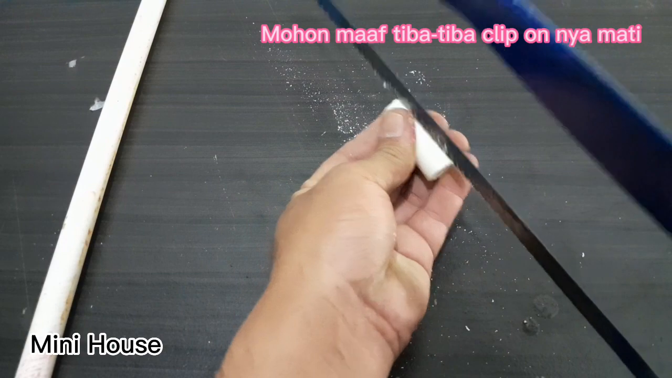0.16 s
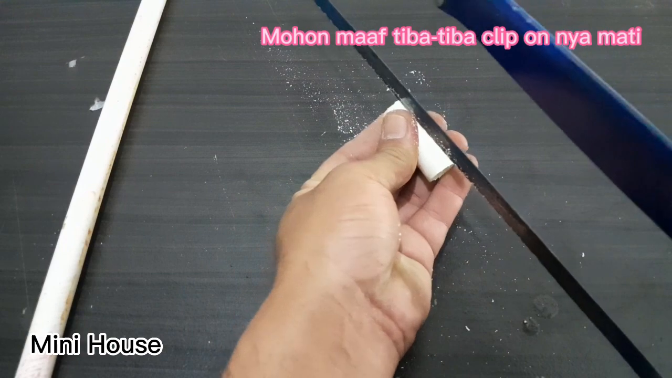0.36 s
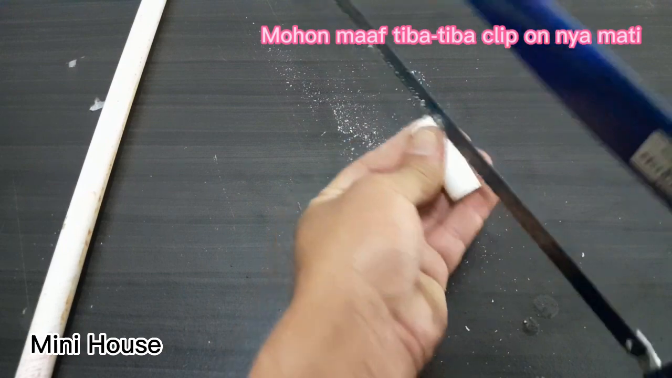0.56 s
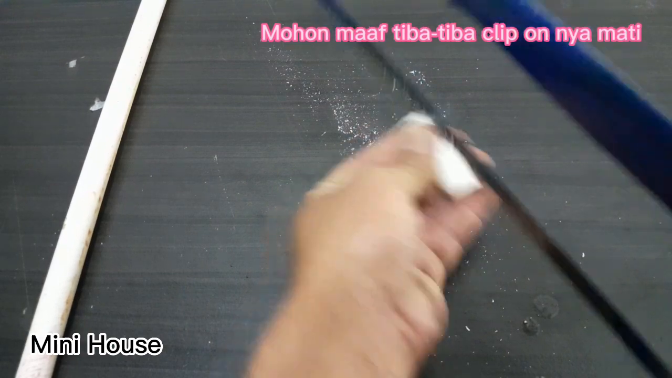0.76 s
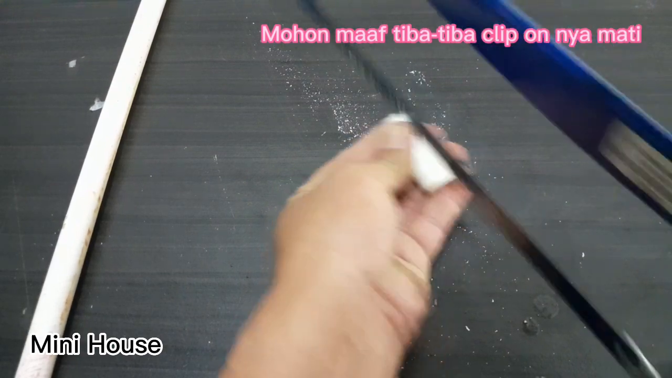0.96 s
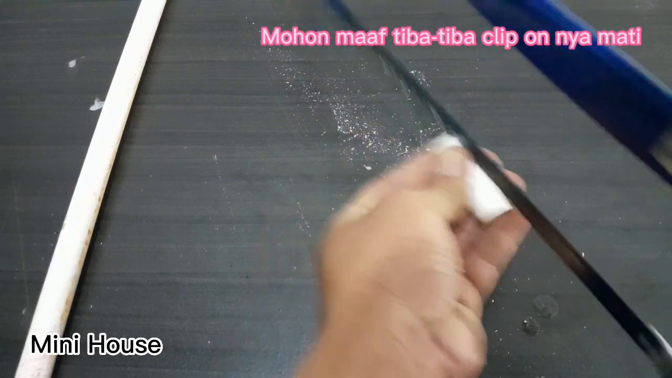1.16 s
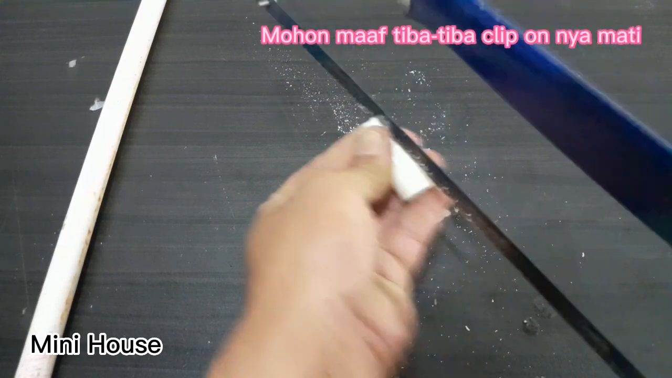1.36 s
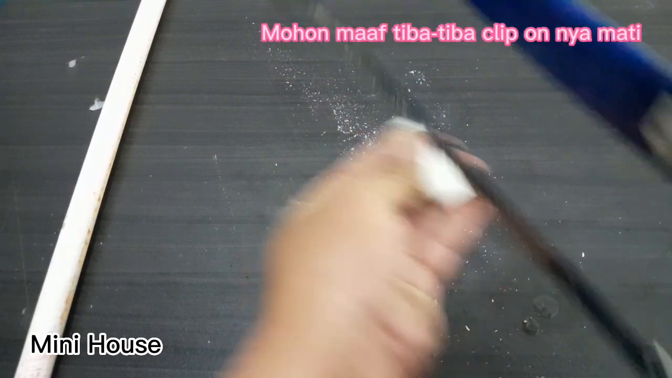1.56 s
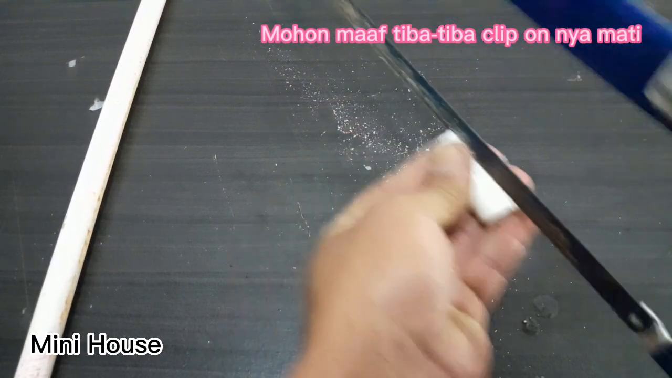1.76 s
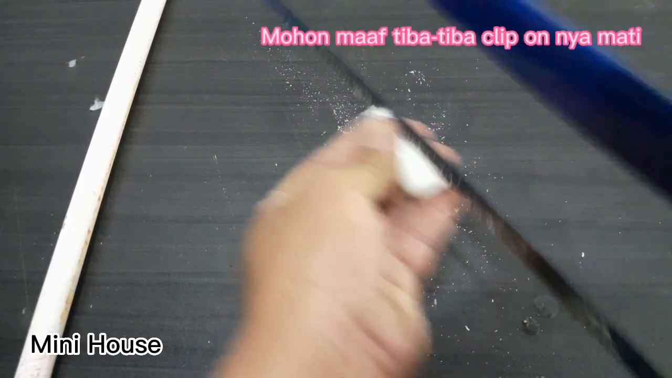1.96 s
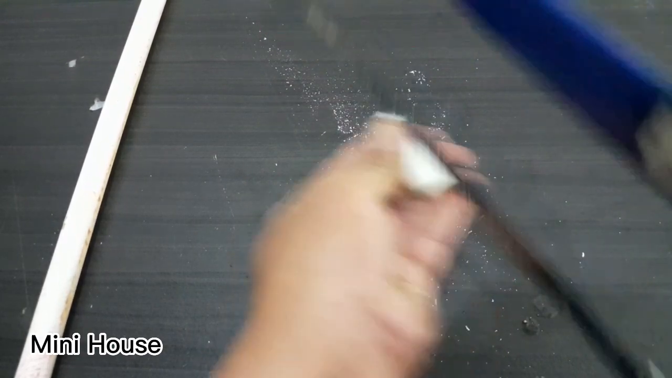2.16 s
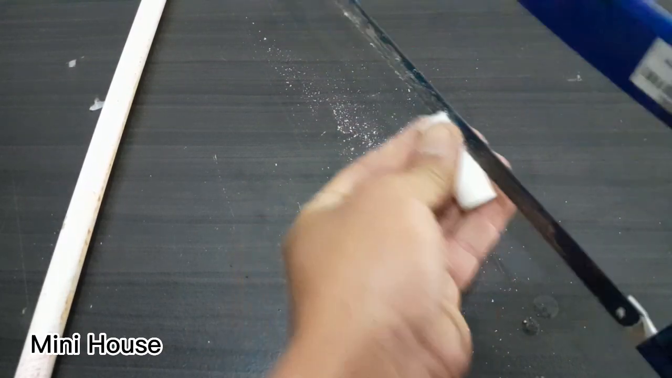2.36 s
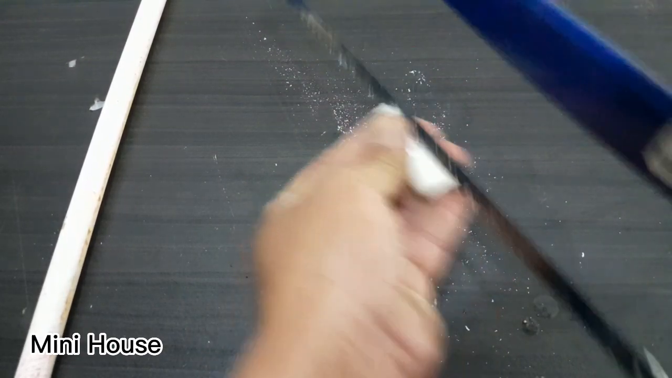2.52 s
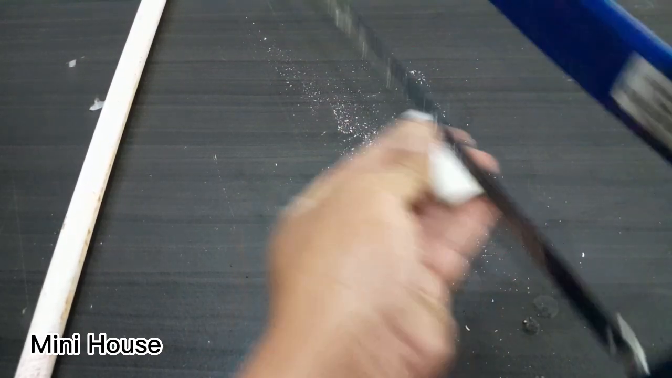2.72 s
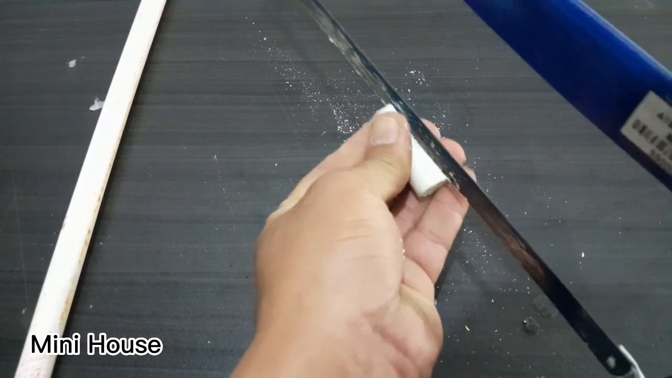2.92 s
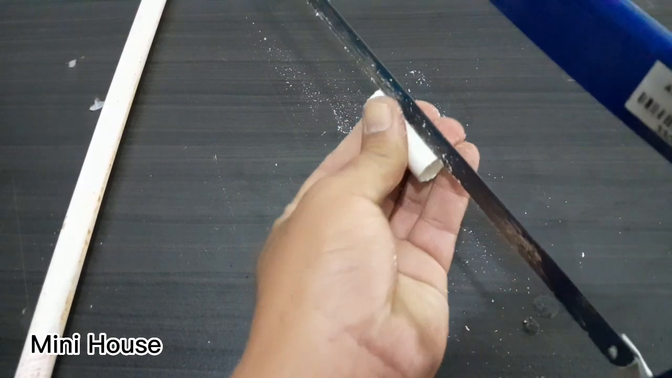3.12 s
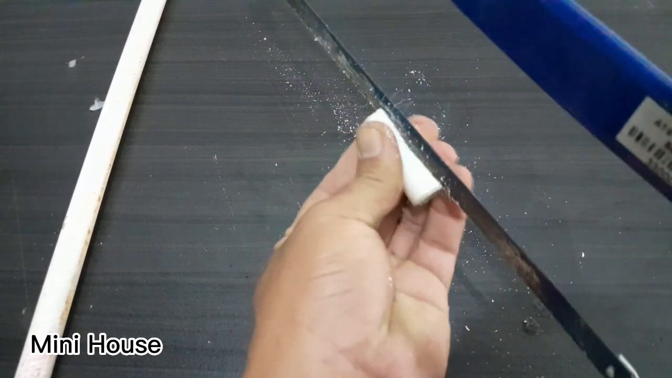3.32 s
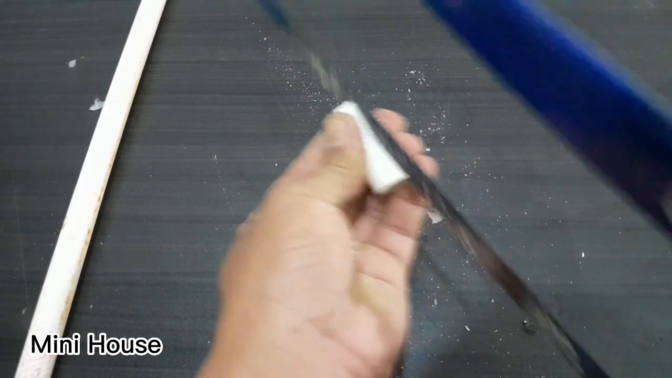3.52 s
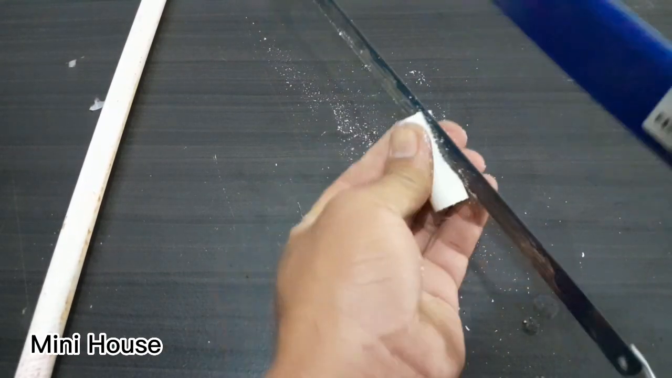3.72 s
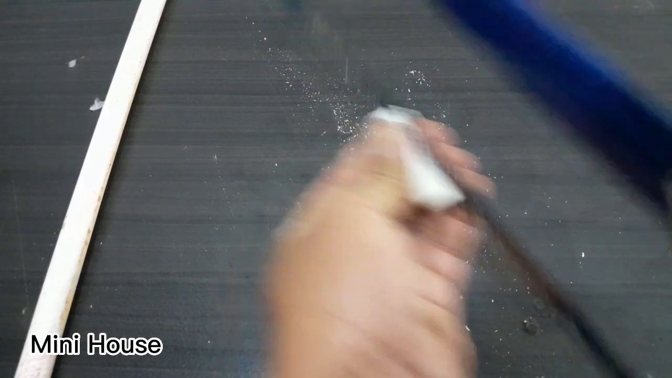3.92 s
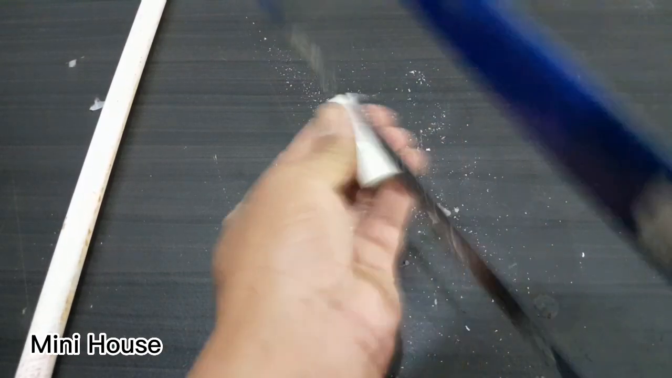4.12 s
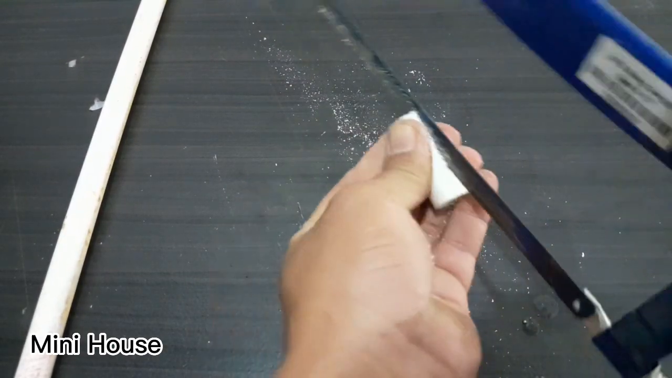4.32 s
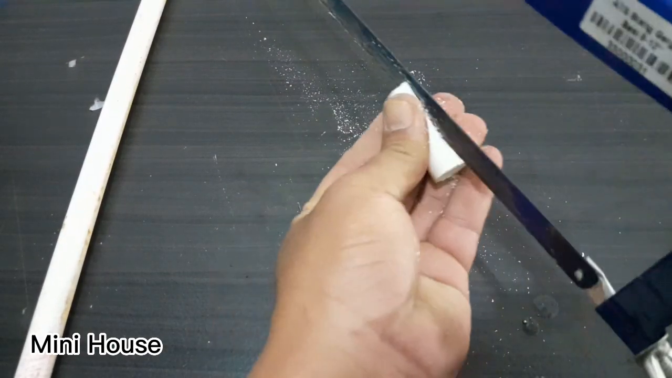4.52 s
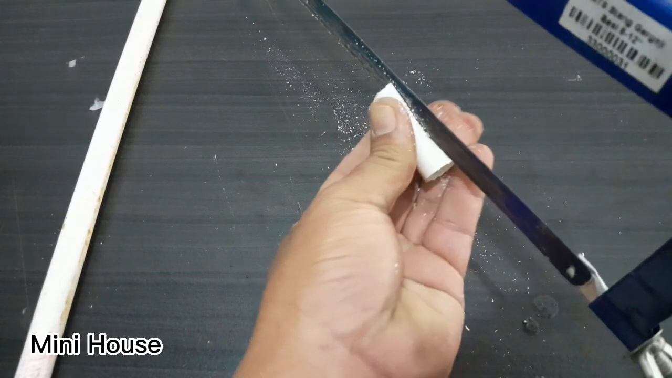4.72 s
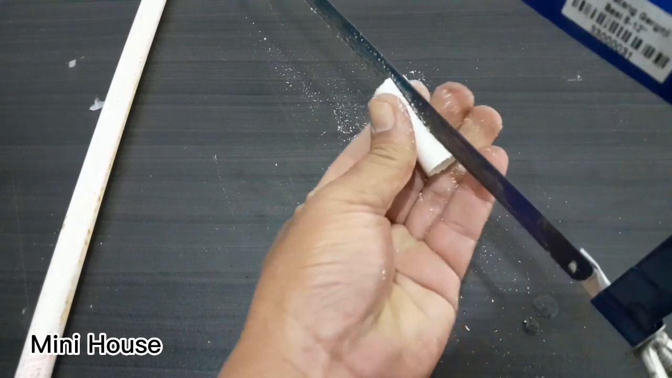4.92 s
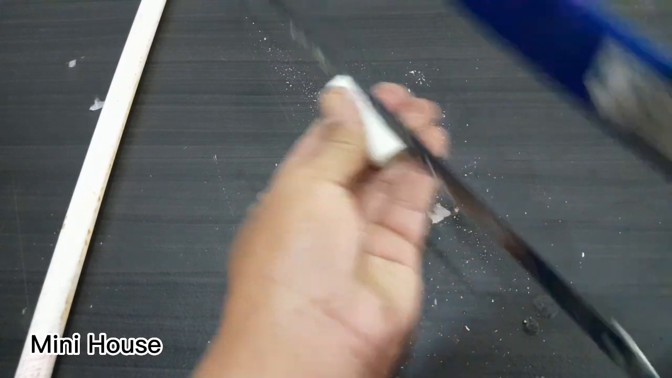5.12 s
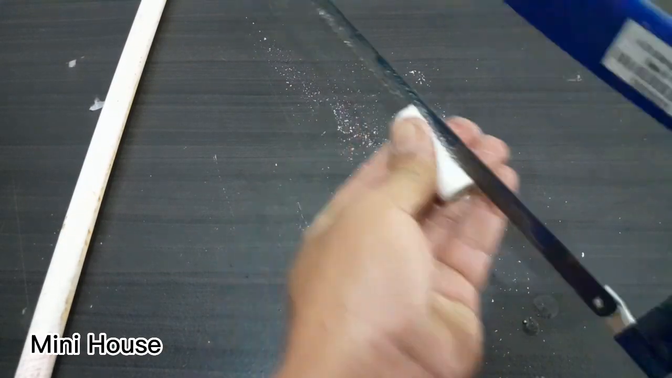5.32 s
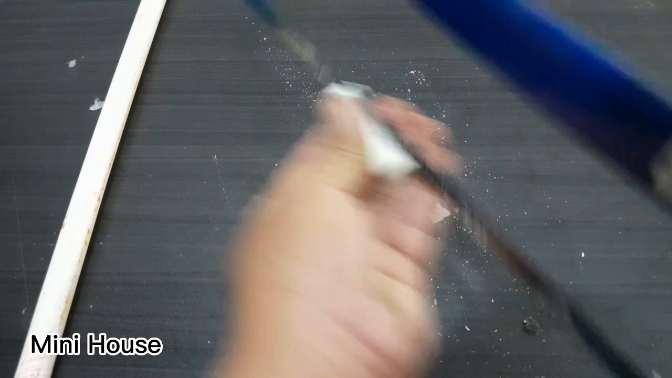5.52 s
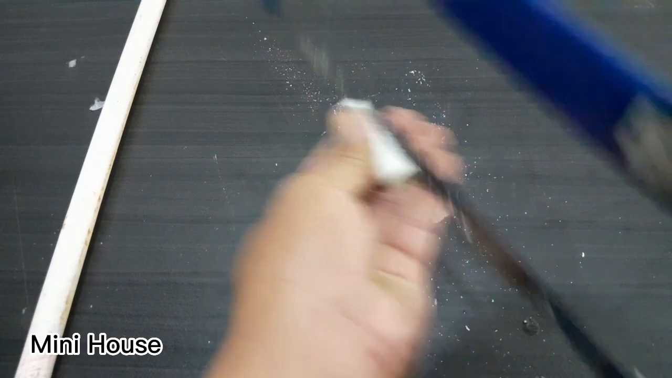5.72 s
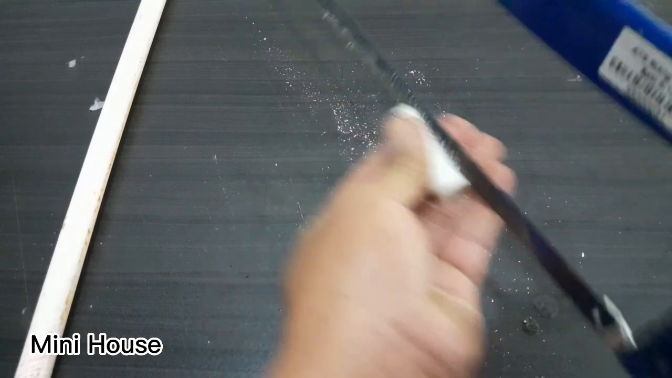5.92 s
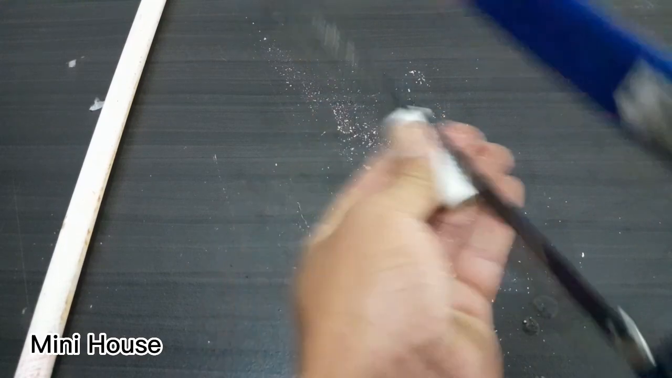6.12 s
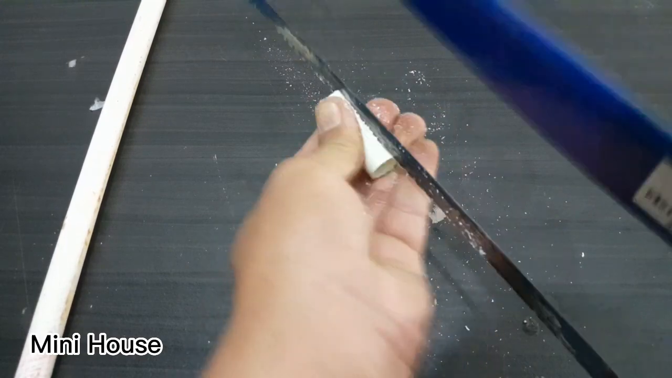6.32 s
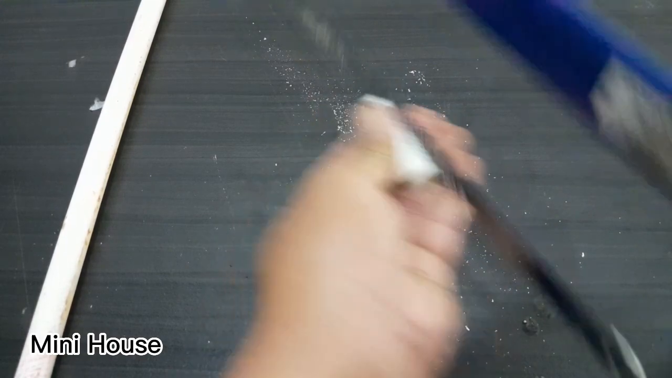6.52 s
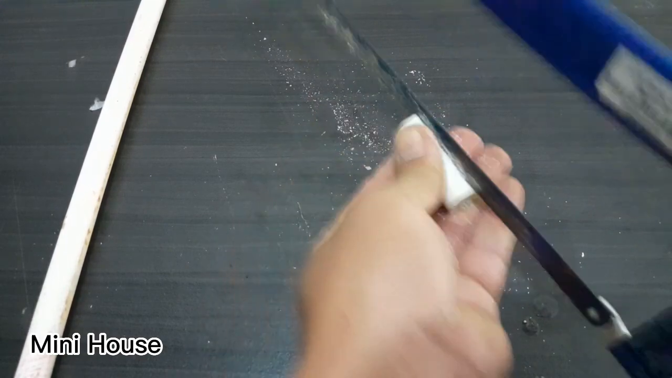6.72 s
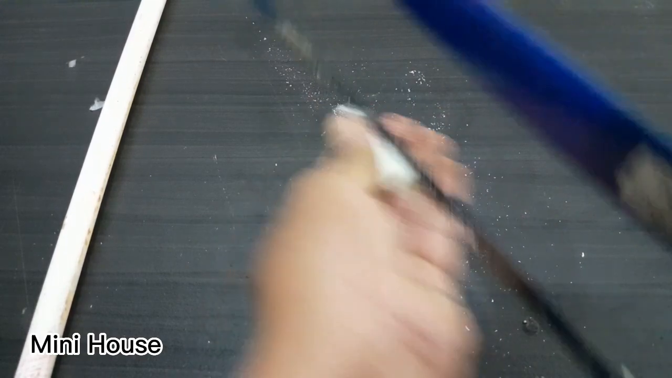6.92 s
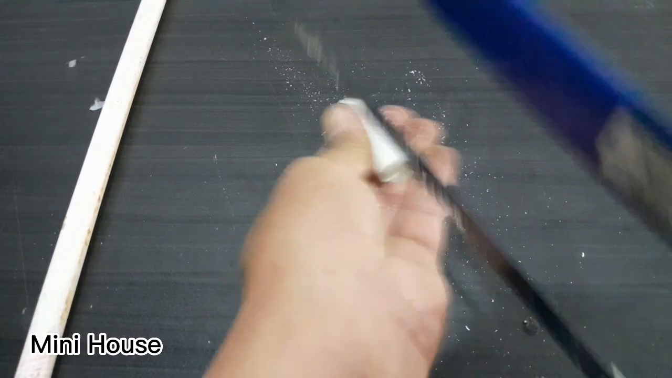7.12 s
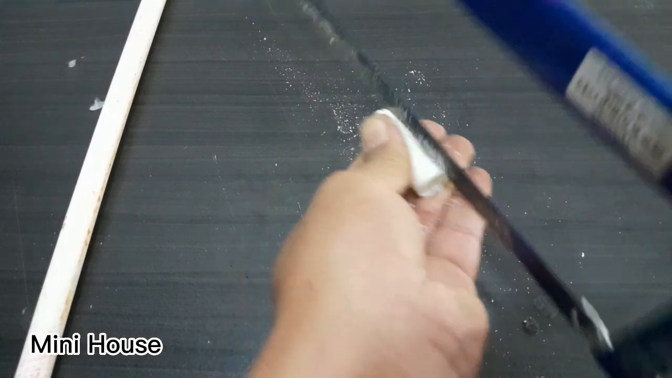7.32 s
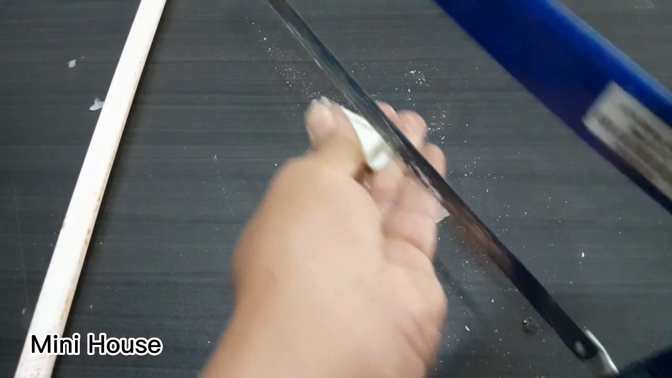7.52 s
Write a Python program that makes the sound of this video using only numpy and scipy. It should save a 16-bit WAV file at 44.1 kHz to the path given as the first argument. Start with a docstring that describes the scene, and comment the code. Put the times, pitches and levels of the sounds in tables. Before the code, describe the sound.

A hacksaw cuts a short plastic pipe close to the microphone in a quiet workshop with a slight echo and faint hiss. Three light rasping strokes begin at about 0.5 seconds, with soft bench thuds and low puffs of air on the microphone just before 1 second. From 1.2 to 2.9 seconds the saw runs quickly, about seven strokes a second, each a bright scrape with a hollow pipe note, a slight buzz and faint blade ringing. After a short pause, the blade catches with the loudest snap at 3.4 seconds. More strokes follow until a click at 4.4 seconds and another lull. From 5.1 seconds the sawing runs steadily again, hollower and more resonant, with small clicks around 6.5 seconds and a second sharp snap just after 7. The last stroke fades at about 7.5 seconds.

```python
"""Quick, rasping strokes of a hacksaw cut a short plastic pipe, close by in a quiet workshop.
Each stroke drags the teeth through the wall: chips tear off, the pipe sings a hollow note, the frame
buzzes higher as the blade moves faster, and the blade rings faintly. Now and then the blade catches
with a snap or the bench thuds. Moving air rumbles on a phone's two microphones over a faint hiss."""
import sys
import numpy as np
from scipy import signal
from scipy.fft import rfft, irfft, next_fast_len
from scipy.io import wavfile
from scipy.ndimage import uniform_filter1d, map_coordinates

SR = 44100
rng = np.random.default_rng(int(sys.argv[2]) if len(sys.argv) > 2 else 0)


def transcribe(u):
    """Save the signal u as a 16-bit wav file named by the first command-line argument.

    u: samples, shape (n,) or (channels, n), limited to [-1, 1]; the rate is SR.
    q: integer samples, one column per channel.
    """
    v = np.clip(np.atleast_2d(u).T, -1, 1)
    q = np.round(v * 32767).astype(np.int16)
    wavfile.write(sys.argv[1], SR, q)


N = 333837
T = np.arange(N) / SR

# saw strokes: (start [s], length [s], rasp level [dB], pipe boost [dB], top speed [teeth/s])
STROKES = [(0.47, 0.13, -46, -12.5, 567.5), (0.638, .13, -47, -25.5, 573.5),
           (0.803, .126, -42.5, -7.5, 682.9), (1.165, 0.1, -36.5, -9, 792),
           (1.324, .109, -39.5, -4.5, 809.3), (1.454, 0.1, -38, -2.5, 1020), (1.596, 0.1, -39, -3, 883),
           (1.714, 0.11, -38, 1.5, 908.4), (1.897, 0.11, -40, -0.5, 886), (2.026, 0.11, -36.5, 2, 898),
           (2.168, 0.11, -40, -4, 653), (2.318, 0.11, -38.5, 0.5, 777.3), (2.437, 0.12, -41, -4.5, 590),
           (2.58, 0.1, -38.5, 0, 779.4), (2.761, 0.099, -43.5, -20, 683), (3.518, .115, -46, -1.5, 582),
           (3.659, 0.1, -37.5, -2.5, 656), (3.819, 0.12, -38, -6, 680.5), (3.956, .11, -32.5, -4.5, 899),
           (4.103, .12, -36.5, -2.5, 654), (4.237, 0.12, -36.5, 7, 874), (5.102, 0.16, -46.5, 1.9, 625),
           (5.281, 0.1, -40, 3, 764.5), (5.437, 0.13, -39, 2, 877.3), (5.574, 0.11, -35.5, 6, 951),
           (5.717, .126, -39, 0, 716.6), (5.864, 0.097, -38.5, 5, 896.6), (5.983, 0.12, -41.5, 4, 650.5),
           (6.132, .095, -39, 5.5, 792), (6.272, 0.12, -38.5, 0.8, 596.7), (6.415, 0.11, -40.5, 2.5, 896),
           (6.531, 0.14, -43.5, 3.5, 650), (6.683, 0.12, -39.5, 3, 779.6), (6.846, 0.11, -39, 1.5, 685.5),
           (6.973, 0.12, -38, 6, 929), (7.089, 0.15, -42.5, 3, 647), (7.247, 0.1, -41, 0.5, 636.6),
           (7.38, 0.14, -48, -0.5, 625)]
# moments when the blade catches: (time [s], level [dB], pipe boost [dB])
SNAPS = [(0.2254, -55, -27), (0.466, -51, -15), (1.0087, -40, -9), (1.3294, -48, -8), (1.719, -45, 1),
         (1.7595, -34.5, 0), (2.0459, -59, 9), (2.4595, -37, -14), (2.7681, -50, -1), (3.0937, -55.5, 0),
         (3.3725, -16, -26), (3.836, -44, -3), (3.959, -46, -3), (4.4072, -34.5, -1.5), (4.4762, -53, 2),
         (5.4467, -40.5, -1.5), (5.5889, -42, 6), (5.8664, -39, 2.5), (6.1306, -42, -1.5),
         (6.1602, -45, -2), (6.422, -33.5, 1.3), (6.4584, -38, 1.2), (6.4702, -31.5, 1.5),
         (6.6955, -29, 4.5), (6.8538, -45, 5.5), (7.0606, -22.5, -28), (7.2499, -44, -4)]
# tones of the pipe with a deep cut: (pitch [Hz], width [Hz], level [dB])
DEEP_CUT_TONES = [(2750, 167, 0.5), (2905, 58, -6), (3210, 273, 11), (3474, 440, 6), (4140, 525, 1)]
# tone colour of the shaking bench: (frequency [Hz], level [dB])
BENCH_COLOUR = [(40, -32), (80, -0.5), (160, 1.5), (250, -7), (460, -12), (700, -19), (1200, -80)]


def amp(db):
    """Turn decibels into a gain; amp(-60 * t / fade) falls by 60 dB in the fade time."""
    return 10 ** (np.asarray(db) / 20)


def unit(x):
    """Scale x to an average (rms) strength of 1."""
    return x / np.sqrt(np.mean(x ** 2) + 1e-20)


def along(points, hz):
    """Read a (frequency, value) table between its rows, on a pitch-like scale."""
    f, v = np.transpose(points)
    return np.interp(np.log(hz + 1), np.log(f + 1), v)


def curve(rows, column=1):
    """Join the rows of a time table into one value per sample."""
    rows = np.asarray(rows)
    return np.interp(T, rows[:, 0], rows[:, column])


def wobble(rate):
    """Glide smoothly through `rate` random values a second."""
    return map_coordinates(rng.standard_normal(int(N * rate / SR) + 4), [T * rate])


def filtered(x, response):
    """Scale and delay each frequency of x as response(hz) says."""
    size = next_fast_len(N + SR // 4)
    return irfft(rfft(x, size) * response(np.fft.rfftfreq(size, 1 / SR)), size)[..., :N]


def coloured(x, colour):
    """Shape x with a (frequency, level) table."""
    return filtered(x, lambda hz: amp(along(colour, hz)))


def resonances(tones):
    """A filter that rings at the given tones and keeps white noise equally strong."""
    def response(f):
        total = sum((-1) ** k * amp(db) * 1j * f * width / (hz * hz - f * f + 1j * f * width)
                    for k, (hz, width, db) in enumerate(tones))
        return total / np.sqrt(np.mean(np.abs(total) ** 2))
    return response


def microphones(pair, left_lead_s):
    """Spread two unrelated versions of a sound over both microphones; the left hears it first."""
    likeness = [(300, 0.1), (1500, 0.23), (3200, 1), (4500, 0.43), (6500, 0.64), (9000, 0.07),
                (15000, 0.068)]  # how alike both sides sound: (frequency [Hz], likeness [0-1])
    balance = [(400, 15.5), (700, -11.5), (1300, -0.5), (2400, 2.5), (4400, -0.5), (8000, 1), (15000, 1)]  # which side is louder: (frequency [Hz], left over right [dB])
    angle = lambda hz: np.arccos(np.clip(along(likeness, hz), -1, 1)) / 2
    mid, side = filtered(pair, lambda hz: np.array([np.cos(angle(hz)), np.sin(angle(hz))]))
    sign = np.array([[1], [-1]])
    lead = lambda hz: np.exp(1j * np.pi * hz * left_lead_s * sign)
    return filtered(mid + sign * side, lambda hz: amp(sign * along(balance, hz) / 2) * lead(hz))


def outdoor_hiss():
    """A faint, wavering hiss from outside, different on each side."""
    colour = [(90, -15), (170, 2.5), (400, -9), (1250, -23.5), (1800, -19), (2300, -5.5), (2900, -12.5),
              (3700, -11), (4400, -2.5), (5300, -1.5), (6000, -10), (7300, 0), (8200, -13), (9200, -22.5),
              (15600, -19)]  # far-off hiss: (frequency [Hz], level [dB])
    noise = coloured(rng.standard_normal((2, N)), colour)
    return amp(-65 + 1.5 * wobble(4.62)) * unit(noise)


def air_rumble():
    """Air stirred by the arm buffets each microphone on its own, the right one far more."""
    draught = [(0.0, -80), (0.21, -64.5), (0.59, -62.5), (1.1, -57), (2.04, -64.5), (2.7, -60.5),
               (2.99, -73), (3.6, -69), (4.3, -60.5), (4.45, -74), (4.81, -75), (5.21, -66), (5.63, -60),
               (6.98, -66), (7.57, -70)]  # steady flow of air: (time [s], level [dB])
    puffs = [(0.69, 0.036, -53), (0.827, 0.032, -32.5), (0.912, 0.026, -33), (1.155, 0.13, -45.5),
             (1.93, 0.019, -50), (2.2, 0.027, -58), (2.78, .03, -58), (3.7, 0.049, -56), (3.78, 0.1, -53.5),
             (4.3, 0.073, -57), (5.6, 0.094, -58), (7.02, 0.039, -60), (7.3, 0.051, -55)]  # single gusts: (start [s], hold [s], level [dB])
    colour = [(15, -48), (25, -38), (48, 2.5), (88, 5), (140, -9.5), (240, -20.5), (400, -34), (800, -104)]  # air on a microphone: (frequency [Hz], level [dB])
    rise_db_per_s, fall_db_per_s = 1800, 700
    puff_db = [db - rise_db_per_s * (start - T).clip(0) - fall_db_per_s * (T - start - hold).clip(0)
               for start, hold, db in puffs]
    right_db = np.max([curve(draught), *puff_db], axis=0) + 5
    left_db = np.minimum(right_db - 6.5, -58)
    flutter = amp(2.7 * np.array([wobble(15), wobble(14)]))
    return amp([left_db, right_db]) * unit(coloured(flutter * rng.standard_normal((2, N)), colour))


def blade_moves():
    """List strokes, then slides, as (start, fastest moment, end, rasp level, pipe boost, top speed)."""
    # the blade jerks free and slides to rest: (start [s], length [s], rasp level [dB], pipe boost [dB])
    slides = [(0.221, 0.087, -66, -23), (1.002, 0.12, -41.5, -19), (3.044, .06, -70.5, 9.5),
              (3.304, .07, -61, -13), (3.372, .17, -50, -15), (4.474, .037, -57, 8.5),
              (4.904, .035, -72, 9), (4.97, 0.035, -77, 12)]
    slide_teeth_per_s = 401.4
    moves = []
    for start, length, db, pipe_db, top_speed in STROKES:
        speed_up_share = .58 + .3 * (length - .115) + .007 * pipe_db
        moves.append((start, start + speed_up_share * length, start + length, db, pipe_db, top_speed))
    for start, length, db, pipe_db in slides:
        moves.append((start, start + .06 * length, start + length, db, pipe_db, slide_teeth_per_s))
    return moves


def arm():
    """The arm's speed sets the gains of rasp, pipe and buzz, and the teeth passing per second."""
    # the frame's buzz swells and dips from one group of strokes to the next: (time [s], level [dB])
    buzz_trim = [(0.5, -6.5), (1.9, -12), (2.65, -7), (2.8, -20.5), (4.3, -9.5), (5.2, -15.5), (5.7, -8.5),
                 (6.3, -16.5), (6.95, -16.5), (7.5, -8.5)]
    buzz_db_per_octave = 6.5
    rasp, pipe, buzz, rate = np.zeros((4, N))
    for start, fastest, end, db, pipe_db, top_speed in blade_moves():
        near = slice(max(round((fastest - .3) * SR), 0), round((fastest + .3) * SR))
        edges = lambda stretch: fastest + stretch * (np.array([start, fastest, end]) - fastest)
        arc = lambda stretch: np.sin(np.pi * np.interp(T[near], edges(stretch), [0, .5, 1])).clip(0)
        speed = arc(1)
        contact = speed + amp(-17) * arc(1.89)  # the blade still creeps while the arm turns round
        rasp[near] += amp(db) * contact
        pipe[near] += amp(db + pipe_db) * contact ** 2  # the wall rings most at full pressure
        buzz[near] += amp(db + buzz_db_per_octave * np.log2(top_speed / 800)) * speed
        rate[near] = np.maximum(rate[near], top_speed * speed ** .42)
    return rasp, pipe, buzz * amp(curve(buzz_trim)), np.maximum(rate, 350)


def teeth(rate, jitter, scatter_db):
    """One click for each tooth that passes the wall, unevenly spaced and sized."""
    at = np.flatnonzero(np.diff(np.floor(np.cumsum(rate) / SR)))
    shift, size = rng.standard_normal((N, 2))[at].T
    at = np.clip(at + shift * (jitter * SR / rate)[at], 0, N - 1).astype(int)
    return np.bincount(at, amp(scatter_db * size), N)


def chips(bursts, rub, flicker_db):
    """Noise of tearing plastic: a burst for each tooth on top of steady rubbing."""
    return unit((bursts + rub) * amp(flicker_db * wobble(70)) * rng.standard_normal((2, N)))


def pipe_note(gain, bursts, beat, depth):
    """Chips and teeth ring the hollow pipe, whose note changes as the cut deepens."""
    shallow_tones = [(2564, 230, -1.5), (2810, 297, 3), (3434, 196, 1.5)]  # pipe with a shallow cut: (pitch [Hz], width [Hz], level [dB])
    drive = gain * (chips(bursts, rub=0.51, flicker_db=2.5) + 0.2 * unit(beat))
    shallow = filtered(drive * np.sqrt(1 - depth), resonances(shallow_tones))
    return shallow + filtered(drive * np.sqrt(depth), resonances(DEEP_CUT_TONES))


def chip_rasp(gain, bursts):
    """Tearing chips make a bright rasp whose colour shifts as blade and grip change place."""
    colour = [(180, -36), (400, -17.5), (900, -12), (1300, -8), (2200, -3.5), (3000, -3), (3600, -0.5),
              (4600, -1.5), (6500, 0.5), (8300, 1), (9200, -9.5), (12000, -4.5), (14600, -6), (15700, -13)]  # teeth scraping plastic: (frequency [Hz], level [dB])
    steel_tones = [(2600, 490, 6), (5100, 430, 1), (6520, 550, -2.5), (7700, 260, -19), (7980, 160, -1)]  # muffled blade tones: (pitch [Hz], width [Hz], level [dB])
    steel = lambda hz: 1 + amp(-17) * np.abs(resonances(steel_tones)(hz))
    scrape = gain * chips(bursts, rub=6.1, flicker_db=0.53)
    scrape = filtered(scrape, lambda hz: amp(along(colour, hz) - 1) * steel(hz))
    bands = signal.stft(scrape, nperseg=256)[2]
    patches = uniform_filter1d(rng.standard_normal(bands.shape[1:]), size=4, axis=0)  # blur in pitch
    patches = uniform_filter1d(patches, size=14, axis=1)  # and in time
    return signal.istft(bands * amp(3.5 * unit(patches)), nperseg=256)[1][:, :N]


def frame_buzz(gain, beat):
    """The beat of the teeth buzzes through the saw frame, louder on the left."""
    frame_tones = [(629, 76, 6.5), (890, 400, -2.5), (1856, 74, 5.5)]  # saw frame: (pitch [Hz], width [Hz], level [dB])
    broad_tones = [(780, 500, 0), (1900, 700, -8)]  # same columns
    buzz = filtered(beat, lambda hz: resonances(frame_tones)(hz) * resonances(broad_tones)(hz))
    return amp(-4) * gain * unit(buzz) * [[1], [.7]]


def sawing():
    """Each tooth tears a short burst of chips; pipe, frame and bench answer."""
    cut_depth = [(0, 0), (1.6, 0.15), (2.1, .45), (2.9, 0.5), (3.4, 0.96), (7.6, 1)]  # progress of the cut: (time [s], shallow to deep [0-1])
    depth = np.clip(curve(cut_depth), 0, 1)
    rasp_gain, pipe_gain, buzz_gain, rate = arm()
    bites = teeth(rate, jitter=.25, scatter_db=1.5)
    bursts = signal.fftconvolve(bites, amp(-60 * T[:400] / 0.0044))[:N]
    bursts /= uniform_filter1d(bursts, size=1300) + 0.00088  # even out, so the arm sets the loudness
    beat = teeth(rate, jitter=.075 + .12 * (1 - depth), scatter_db=4)  # steadier in a deep cut
    cut = pipe_note(pipe_gain, bursts, beat, depth) + chip_rasp(rasp_gain, bursts)
    cut += frame_buzz(buzz_gain, beat)
    bench_shake = amp(-23) * rasp_gain * unit(coloured(rng.standard_normal(N), BENCH_COLOUR))
    return microphones(cut, left_lead_s=36e-6) + bench_shake


def blade_snaps():
    """The blade catches, then slips in a brief burst that also knocks the pipe."""
    snap_tones = [(1100, 610, -18.5), (1800, 550, -10), (2360, 250, -5.5), (3320, 220, 1.5),
                  (4530, 750, -1.5), (5720, 720, 2), (6790, 400, 3), (8240, 600, -7.5), (12300, 2000, -20),
                  (15150, 1100, -23)]  # blade held in the cut: (pitch [Hz], width [Hz], level [dB])
    blade, pipe = np.zeros((2, 2, N + SR))
    t = T[:SR // 10]
    fade = amp(-60 * t / 0.015) + 0.077 * amp(-60 * t / 0.06)  # sharp crack, faint tail
    fade *= 1 - np.exp(-t / 0.000075)
    knock = np.outer([1, .3], np.hanning(20) * np.sin(2 * np.pi * 2900 * t[:20]))
    for start, db, pipe_db in SNAPS:
        at = round(start * SR)
        blade[:, at:at + len(t)] += amp(db) * fade * rng.standard_normal((2, len(t)))
        pipe[:, at:at + 20] += amp(db + pipe_db + 8.5) * knock
    cracks = filtered(blade[:, :N], resonances(snap_tones))
    knocks = filtered(pipe[:, :N], resonances(DEEP_CUT_TONES))
    return microphones(cracks + knocks, left_lead_s=43e-6)


def blade_ring():
    """Snaps and the fastest moment of each stroke kick two blade tones that swell and die away."""
    # tones the pipe hardly muffles: (pitch [Hz], fade time [s], left over right [dB])
    tones = [(1545, .95, 9), (1835, .33, 3)]
    # how freely the blade rings: (time [s], lower tone [dB], upper tone [dB])
    freedom = [(0.55, -26, -22), (1.05, -26, -8), (1.25, -23.5, -13), (2.25, -20.5, -20), (2.65, -36, -25),
               (3.4, -16.5, -7), (3.8, -29.5, -21.5), (4.3, -19, -22), (5.15, -24, -29), (5.4, -19.5, -21),
               (6.35, -20, -27.5), (6.6, -47, -42), (7.05, -20, -16.5), (7.5, -17, -12)]
    strokes = [(fastest, db) for _, fastest, _, db, *_ in blade_moves()[:len(STROKES)]]
    when, kick_db = np.transpose(strokes + [(start, db - 31) for start, db, _ in SNAPS])
    at = (when * SR).astype(int)
    ring = 0
    for column, (hz, fade_s, left_db) in enumerate(tones, 1):
        kicks = np.full(N, -200.)
        kicks[at] = kick_db + curve(freedom, column)[at] + 60 * when / fade_s
        level = amp(np.maximum.accumulate(kicks) - 60 * T / fade_s)  # the loudest fading kick wins
        level = uniform_filter1d(np.pad(level, (300, 0))[:N], size=1100)  # soften each start
        phase = 2 * np.pi * hz * T + 0.8 * wobble(7.4)  # fresh bites push the phase about
        tone = np.sin(phase + [[0], [1.3]]) * amp([[0], [-left_db]])
        ring += level * amp(5 + 2.5 * wobble(14)) * tone
    return ring


def bench_thuds():
    """Soft bumps ring the bench, a little differently each time, and leave a short rattle."""
    bumps = [(0.474, -63), (0.541, -45.5), (0.675, -38), (0.868, -40.5), (0.948, -32)]  # knocks on the bench: (time [s], level [dB])
    tones = [(254.4, 0.5, 0.1), (454, 2.5, 0.064), (90, -10, 0.089), (790, -12.5, 0.033)]  # ringing bench: (pitch [Hz], level [dB], fade time [s])
    thuds, rattle = np.zeros((2, N + SR))
    t = T[:SR // 4]
    for start, db in bumps:
        at = round(start * SR)
        ring = sum(amp(tone_db + rng.normal(0, 1.5) - 60 * t / fade_s) * np.sin(2 * np.pi * hz * t)
                   for hz, tone_db, fade_s in tones)
        thuds[at:at + len(t)] += amp(db - 3.5) * ring * (1 - np.exp(-t / 0.00076))
        rattle[at:at + len(t)] += amp(db + 10 - 60 * t / 0.77) * rng.standard_normal(len(t))
    return (thuds[:N] + coloured(rattle[:N], BENCH_COLOUR)) * amp([[1], [-1]])


def workshop_echo(x):
    """The room echoes x, and each frequency dies away at its own speed."""
    fade_times = [(300, 1), (1500, 0.53), (3300, 0.41), (6500, 0.47), (14000, 0.31)]  # the room's echo: (frequency [Hz], fade time [s])
    hz, t, bands = signal.stft(rng.standard_normal((2, SR // 2)), SR, nperseg=256)
    tail = signal.istft(bands * amp(-60 * t / along(fade_times, hz)[:, None]), SR, nperseg=256)[1]
    delayed = np.pad(x, ((0, 0), (200, 0)))
    return signal.fftconvolve(delayed, tail / np.linalg.norm(tail[0]), axes=1)[:, :N]


def scene():
    """Mix the sawing and snaps, their echo, and the bench, blade, air and hiss."""
    work = sawing() + blade_snaps()
    echo = amp(-11) * workshop_echo(work)
    return work + echo + bench_thuds() + blade_ring() + air_rumble() + outdoor_hiss()


def record(dry):
    """The phone cuts off the very highest treble."""
    return filtered(dry, lambda hz: hz < 15750)


dry = scene()
out = record(dry)
transcribe(out)
```